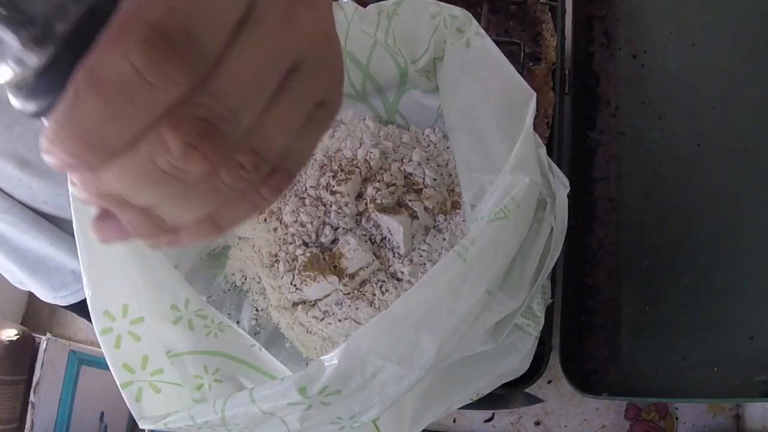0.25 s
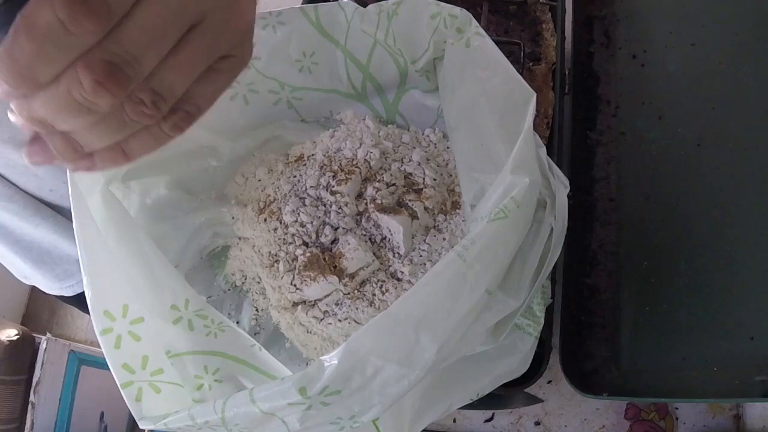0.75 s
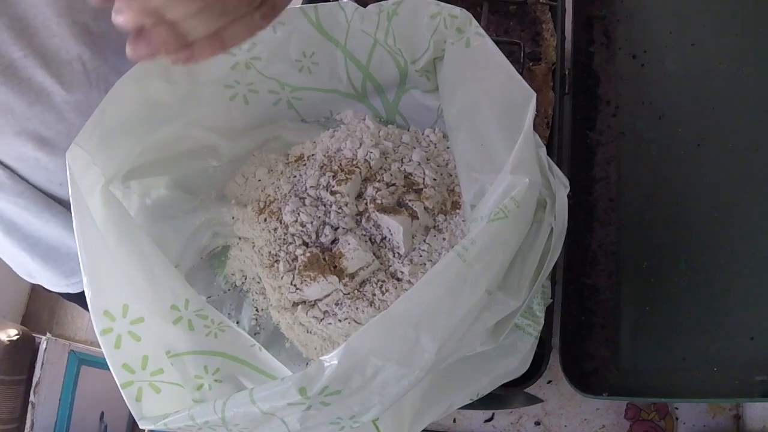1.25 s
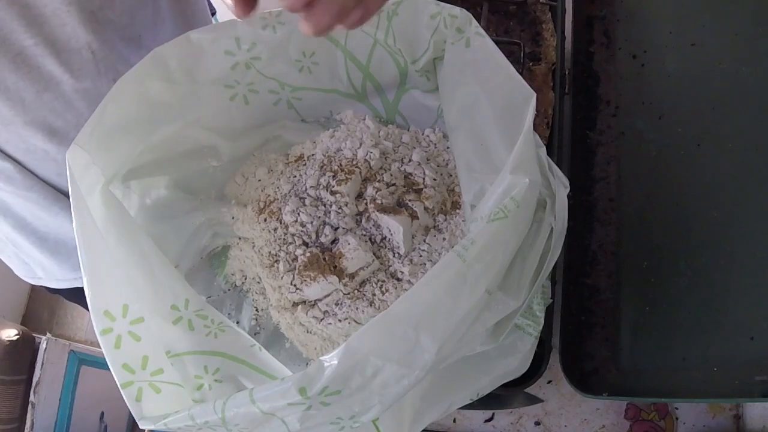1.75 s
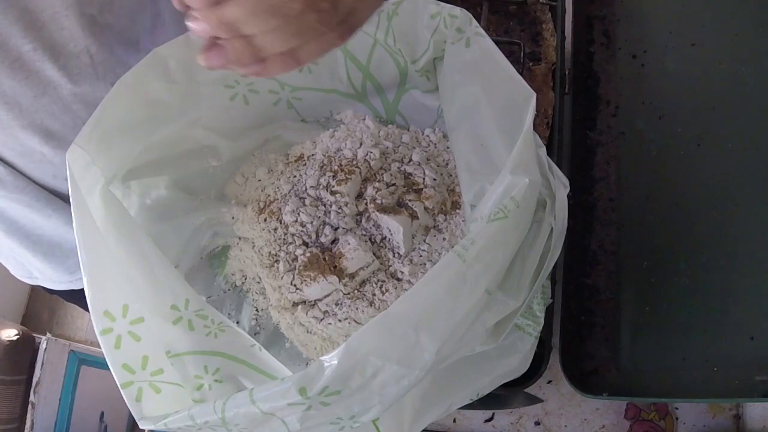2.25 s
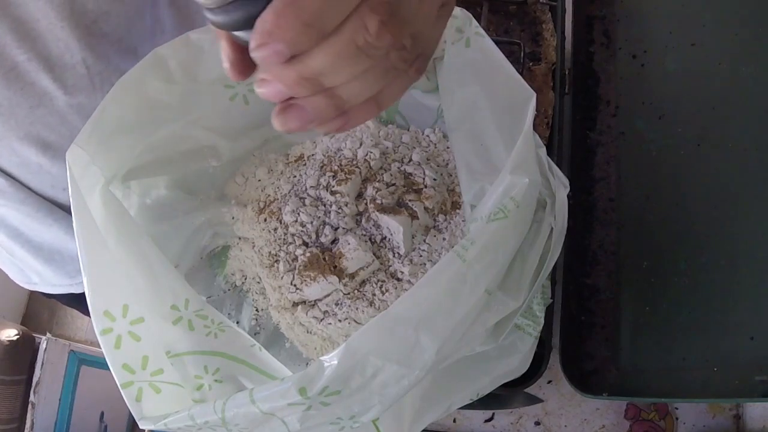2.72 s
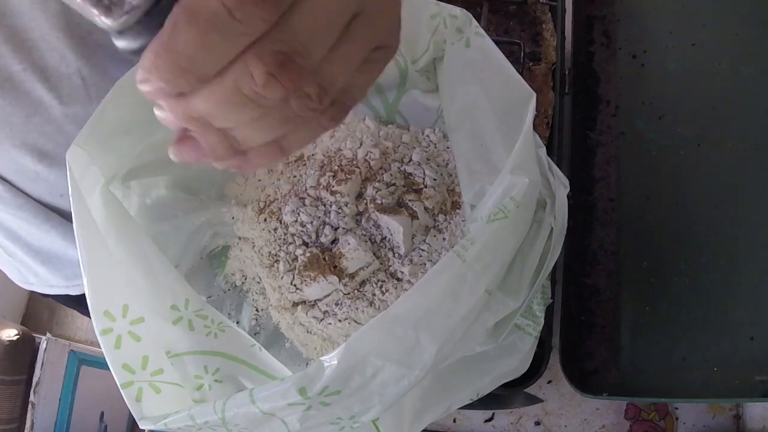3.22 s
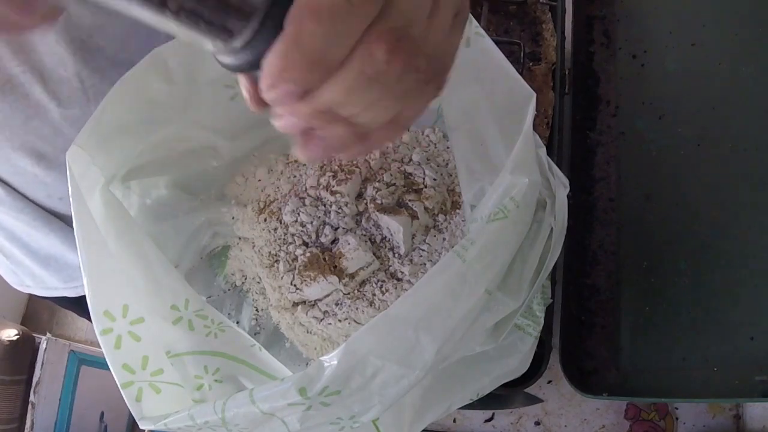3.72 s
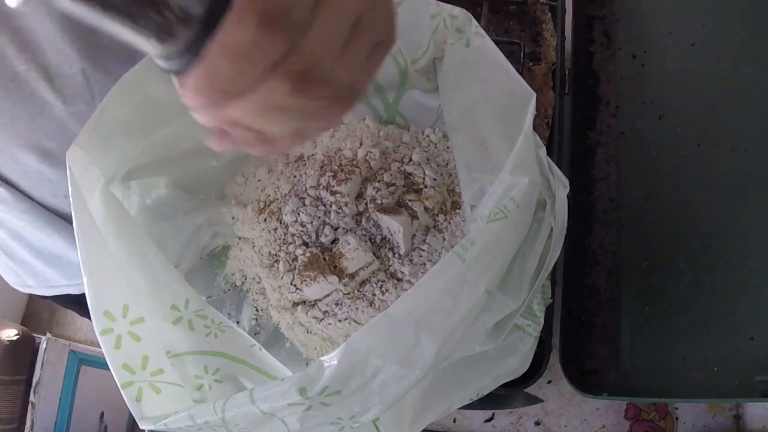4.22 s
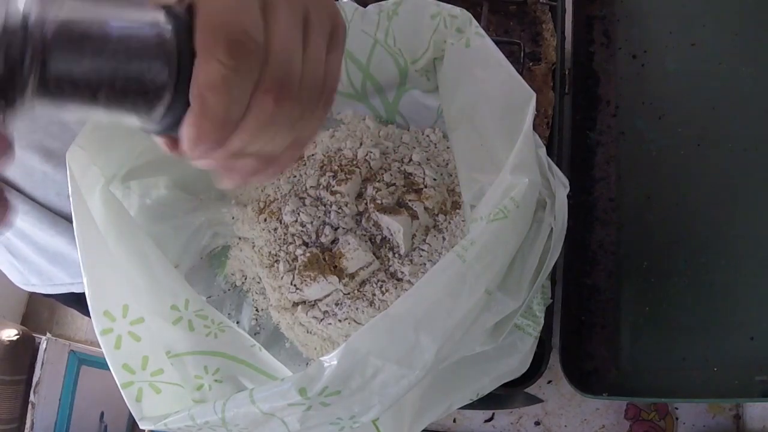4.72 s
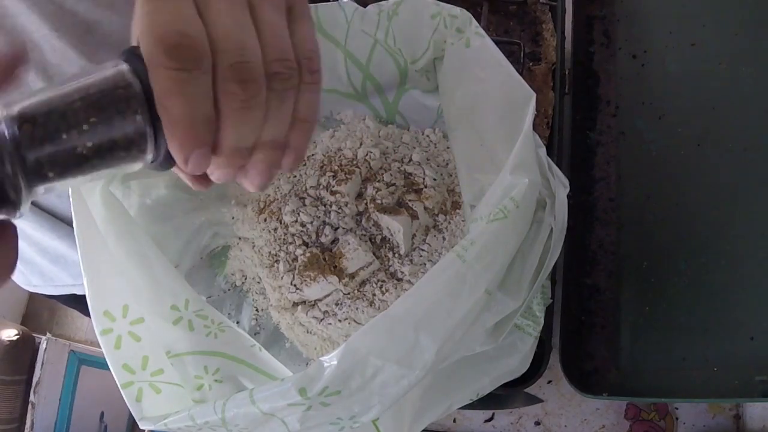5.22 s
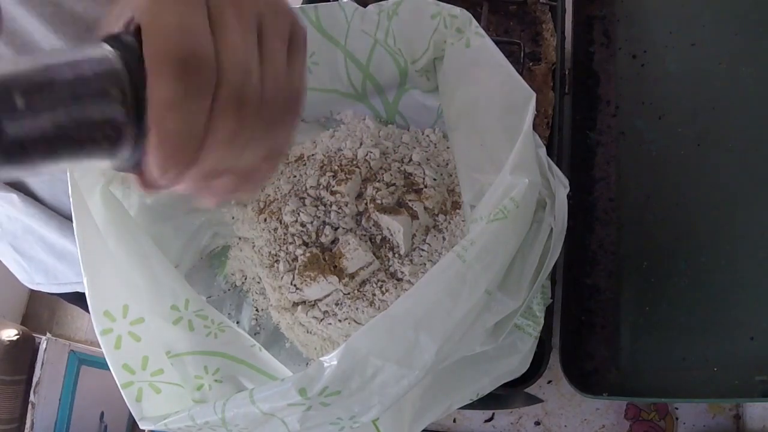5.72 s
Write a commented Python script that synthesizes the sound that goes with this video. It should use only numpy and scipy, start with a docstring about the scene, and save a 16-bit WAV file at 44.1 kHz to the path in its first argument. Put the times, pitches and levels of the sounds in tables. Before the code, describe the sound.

Close, dry crunching of peppercorns in a hand grinder, with bright glassy ticks and sliding rattles over a low kitchen rumble.

```python
"""Loose peppercorns tick and slide on a glass jar while a hand-turned mill crunches and cracks in bouts.
Corns on glass are noise under tiny contact envelopes, ringing the jar's modes, with a dry rustle.
The burr is dense grains and single loud bursts of noise through the housing's resonances.
Dull body thumps, a short kitchen echo, a low rumble, soft dull room noise and faint hums complete the scene."""
import sys
import numpy as np
from scipy import signal
from scipy.fft import rfft, irfft, next_fast_len
from scipy.io import wavfile
from scipy.ndimage import map_coordinates

SR = 44100
rng = np.random.default_rng(int(sys.argv[2]) if len(sys.argv) > 2 else 0)


def generate_wav(sig):
    """Save sig (samples, or channels by samples) to the path in sys.argv[1] as 16-bit PCM at SR."""
    pcm = np.round(np.clip(np.atleast_2d(sig).T, -1, 1) * 32767).astype(np.int16)
    wavfile.write(sys.argv[1], SR, pcm)


def gain_from_decibels(decibels):
    """Convert decibel values to linear amplitude factors."""
    exponent = np.asarray(decibels, float) / 20
    return 10 ** exponent


N = 262836  # length in samples

# All table levels are relative; each layer adds its own level.
# clearest corns striking the jar wall: start_s, level_db, low_ring_db (over level_db)
TICKS = [(0.0349, -24, -22), (.0705, -21, -22), (0.108, -14, -28), (.176, -30, -20), (.2189, -34, -6),
         (.2603, -26, -14), (0.2919, -22, -4), (.3302, -40, 0), (0.3661, -36, 2), (.5042, -22, -19),
         (.554, -31, -11), (.621, -36, -6), (0.6958, -33.5, -3), (0.7294, -29.5, -10), (0.7704, -26, -6.5),
         (0.7932, -23.5, -2.5), (.918, -7, -31), (0.9494, -18, 2), (0.9886, -24, -17), (1.0667, -25.5, -15),
         (1.1628, -31, -12), (1.2354, -31, -5.5), (1.27, -36, -7), (1.287, -25.5, -10.5), (1.37, -30, 7),
         (1.4581, -25, -1), (1.4948, -18, 0), (1.5697, -30, -11), (1.607, -23.5, -11.5), (1.6466, -24, -13),
         (1.6659, -22, -20), (1.728, -28, -21), (1.83, -31.5, -12), (1.899, -15, -15), (1.9643, -22, -19),
         (1.9771, -16, -20), (2.0008, -17, -15), (2.0557, -16.5, -28), (2.3253, -19, -14),
         (2.3472, -16, -4.5), (2.4025, -24, -10), (2.4224, -19, -11), (2.459, -23.5, -7),
         (2.4864, -20.5, -1.5), (2.5145, -12.5, -7.5), (2.5472, -19, -19), (2.584, -14.5, -5),
         (2.6196, -16, -8), (2.676, -24, 3), (2.8684, -22.5, -11), (2.8875, -22, -23),
         (3.0772, -24.5, -1.5), (3.0832, -22, -6), (3.112, -25, -10), (3.269, -11.5, 7), (3.4335, -17.5, 1),
         (3.4582, -16, -8.5), (3.573, -26, -12), (3.597, -21.5, -8), (3.681, -17, -13.5), (3.639, -30, -5),
         (3.9095, -18.5, -11), (3.974, -21, -29), (4.0414, -19.5, -7), (4.197, -14, -3.5), (4.3525, -31, 2),
         (4.499, -28, -9), (4.6078, -21, -12.5), (4.6275, -22.5, -21), (4.685, -24, -8),
         (4.7062, -13.5, -3), (4.728, -19, -4), (4.795, -22.5, -3), (4.8309, -20, -4), (4.9379, -21, -11),
         (5.0389, -27, -18), (5.072, -12, -20.5), (5.2677, -20, -20), (5.287, -14.5, -12), (5.3, -13, 0),
         (5.4091, -16, -10), (5.459, -18.5, -5), (5.6281, -20, -16), (5.66, -15, -17), (5.7478, -26, -17),
         (5.88, -28, -15), (5.9134, -30, -4), (5.9239, -18, -8)]
# loose corns sliding along the glass as the jar tips:
# peak_s, fall_s (time to drop 30 dB), upper_ring_db, low_ring_db and rustle_db (both over upper_ring_db)
SLIDES = [(.014, 0.14, -45.5, -7.5, -1.5), (.115, .12, -37, -7.5, -13), (.23, .05, -51, -9, -14),
          (.176, .08, -39.5, -20, -14), (0.299, 0.13, -45.5, -1, -4), (0.558, 0.025, -42, -20, -1.5),
          (0.809, 0.069, -41.5, -10, -6), (1.055, 0.11, -49, -9.5, 2), (.93, .03, -44, -3.5, 6),
          (1.292, 0.025, -28, -10.5, -9), (1.574, 0.061, -43, -14, -5), (1.66, .06, -49, -12, -2),
          (1.77, 0.068, -40, -5, 0), (1.815, 0.046, -43.5, -12, -3.5), (1.965, .03, -38, -13, -9),
          (2.41, 0.163, -35.5, -4.5, -15), (2.55, 0.11, -40, 1, -23), (2.628, 0.097, -39, 1, -14),
          (2.909, 0.16, -40.5, -5, -6), (3.006, 0.048, -39.5, -6.5, -20), (3.117, 0.051, -22.5, -7, -15),
          (3.33, 0.11, -44.5, -4, 0), (3.438, 0.027, -35, -3, 4.5), (3.465, 0.085, -35.5, -3, 0),
          (3.499, 0.054, -27.5, -10, -18), (3.685, 0.016, -20, -9, -12), (3.7, 0.036, -22.5, -10.5, -12),
          (3.943, 0.33, -34.5, -6.5, -11), (4.203, 0.048, -28, -6, -8), (4.235, .04, -38, -8, -10),
          (4.509, 0.12, -29, -3.5, -1.5), (4.613, .06, -40.5, -13, -1.5), (4.691, 0.071, -31.5, -4, -10.5),
          (4.743, 0.072, -22, -8.5, -11), (4.877, 0.57, -39, -14, -4), (5.083, 0.1, -35.5, -10, 6.5),
          (5.32, 0.064, -18.5, -10.5, -13), (5.38, 0.16, -30, -4.5, -7.5), (5.47, 0.21, -31, -18, -8.5),
          (5.664, 0.086, -27, -14, 1.5), (5.76, 0.072, -33, -10, -4.5), (5.931, 0.093, -27.5, -3.5, -8.5)]
# faint bed between bites and slides: time_s, rolling_db, scraping_db
BED = [(0, -46, -55), (.3, -53, -59.5), (.35, -56, -75), (.6, -56, -76), (.8, -60, -75), (1.05, -50, -68),
       (1.15, -63, -76), (1.26, -70, -74), (1.6, -51, -68), (1.9, -65, -63), (1.93, -37.5, -58),
       (2.08, -44, -62), (2.2, -44, -55), (2.75, -40.5, -59), (2.98, -50, -65), (3.05, -53, -64),
       (3.25, -47, -62), (3.6, -43, -67), (4.1, -42, -58), (4.17, -49, -56.5), (4.27, -66, -70),
       (4.33, -66, -60.5), (4.4, -48.5, -54), (5.2, -47, -60), (5.6, -50, -58), (5.83, -64, -64),
       (5.96, -44, -61.5)]
# how much a bite shakes the corns, over the bite: upper_ring_db, low_ring_db, rustle_db
SHAKE_DB = (-23, -13, -15)
# ringing modes of the glass jar, lowest first: pitch_hz, width_hz, level_db
JAR = [(3165, 190, 1), (4800, 400, -14), (6700, 400, -12), (7800, 220, 0), (8200, 400, -3),
       (10100, 400, -14), (12400, 700, -12)]
# colour of a corn's dry click, without the ring: pitch_hz, level_db (per Hz)
CLICK = [(300, -18), (1000, -23), (2500, -3.5), (5000, -0.5), (7000, 2.5), (10000, -3), (15000, -6)]
# the burr bites into a heap of fragments, grinds on and slips free:
# start_s, hold_s, fall_s (time to drop 30 dB, sign ignored), level_db, thud_db (over level_db)
BITES = [(0.001, .002, 0.13, -42, -30.5), (0.283, .012, 0.6, -62, -20), (.366, 0.006, 0.0536, -18.5, -18),
         (0.403, 0.013, 0.1069, -22, -23), (0.445, 0.056, .03, -40.5, -6.5), (.772, .025, -0.3, -51, -13),
         (0.856, 0.0095, .03, -38, -13), (.897, 0.011, -0.04, -33, -3), (.919, 0.018, .05, -25, -12),
         (0.946, 0.018, 0.03, -37, -19), (1.111, .006, -3, -64, -26), (1.278, .01, 1, -54, -22),
         (1.373, .012, 0.1, -34, -5), (1.391, 0.014, 0.15, -29, -8), (1.46, 0.042, -0.1, -36.5, -18),
         (1.499, .006, 0.08, -26, -17), (1.521, 0.012, 0, -32, -7), (1.668, 0.043, -0.05, -46, -8),
         (1.731, 0.037, 0, -37, -16), (1.901, 0.00089, 0.0151, -14.5, -19), (1.926, .005, 0.12, -37, -17),
         (2.149, 0.02, 0.11, -37, 0.5), (2.175, .025, 0.08, -39.5, -2), (2.203, 0.039, 0.03, -27, -12),
         (2.258, .03, 0.02, -27.5, -6), (2.306, 0.031, 0, -37.5, -3), (2.594, 0.03, -0.16, -51.5, -3),
         (2.648, .025, 0.01, -42, -6), (2.676, .01, 0.09, -33, -12), (2.712, 0.05, 0.08, -31, -9.5),
         (2.808, 0.01, 0.03, -28, -10.5), (3.082, .045, 0.5, -51, -10), (3.183, 0.013, .03, -44, -4),
         (3.202, 0.014, .045, -30.5, -9.5), (3.276, .004, 0.0636, -20, -7), (3.3, 0.043, 0.05, -33.5, -1),
         (3.372, 0.042, 0.27, -43.5, -3.5), (3.676, 0.013, 0.4, -48, -13), (3.754, .02, .05, -35, -3),
         (3.775, .03, 0.08, -33, -3), (3.839, 0.0272, .08, -33, -6), (4.192, .015, 0.5, -57, -8),
         (4.345, .008, .05, -33.5, -10), (4.359, 0.013, 0.06, -29, -9), (4.398, 0.038, 0.18, -41, 0),
         (4.439, 0.039, 0.11, -36, -2), (4.687, 0.068, .1, -48, -8), (4.905, 0.023, 0.16, -38.5, -9),
         (4.936, 0.061, 0.19, -35, -8), (4.997, 0.055, 0, -29, -6), (5.093, 0.0083, .04, -38, -3),
         (5.28, .05, 1.2, -46, -11), (5.507, 0.039, 0.09, -31, -4.5), (5.575, 0.052, 0.04, -32, -7.5),
         (5.66, .02, 0.2, -45, -15), (5.697, .008, 0, -41.5, -8), (5.914, .02, -1, -44, -8)]
# whole corns splitting in the burr: start_s, level_db, knock_hz, thud_db and snap_db (both over level_db)
CRACKS = [(0.292, -35, 2900, -24, 9), (0.3651, -15, 2590, -36, -1), (.405, -11.5, 2480, -11.5, 3),
          (0.8579, -29.5, 2780, -9.5, 2), (0.8966, -8, 2480, -20, -8), (0.919, -5, 2780, -21, 1),
          (1.112, -29, 1700, -31, -12), (1.286, -40, 2660, -17, 4), (1.3754, -18, 2720, -16, -23),
          (1.3905, -10, 2550, -44, -30), (1.4617, -30, 2540, -27, -2), (1.497, -12, 2500, -20, -1),
          (1.732, -32, 1400, -4.5, 0), (1.7578, -23, 1690, -14, -4), (1.9008, -7, 2810, -17.5, 5),
          (2.053, -44, 2830, -14, 20), (2.1433, -18.5, 1420, -15, -22), (2.2055, -14.5, 2510, -22, -21),
          (2.4, -43, 2870, -14.5, 27), (2.484, -44, 2900, -37.5, 15.5), (2.5127, -43, 2890, -12, 21.5),
          (2.6502, -32.5, 2900, -3, -5), (2.6786, -18, 1670, -15, -4), (2.7156, -17, 2700, -10.5, -14),
          (2.7511, -18.5, 2730, -13.5, -24), (2.808, -16.5, 2230, -16, -29), (3.1153, -35, 2810, -13, 11),
          (3.184, -36, 2370, -4.5, 7.5), (3.2007, -29, 2870, -29, -17), (3.2692, -13.5, 1690, -9.5, 1.5),
          (3.432, -47, 2800, -20, 14.5), (3.7547, -38, 2570, -6, -9.5), (3.92, -35.5, 2810, -34, 19.5),
          (4.196, -35.5, 2890, -13, 6.5), (4.347, -26, 2890, -18, -12), (4.351, -17, 1600, -17.5, -19),
          (4.3647, -15, 2420, -20.5, -28), (4.4392, -25.5, 2720, -8, -18.5), (4.912, -36.5, 2550, -2, -1.5),
          (4.938, -18, 2570, -30, -6.5), (4.9673, -19.5, 2130, -26, -9), (4.98, -20, 2570, -15, -12.5),
          (5.282, -39, 2900, -25, 4), (5.2989, -39, 2720, -9, 2), (5.311, -29, 2870, -11.5, 12),
          (5.41, -32, 2810, -17, 18), (5.5073, -19.5, 1460, -28, -17), (5.5487, -15, 2050, -23, -15),
          (5.5707, -22, 2650, -27, -12), (5.6119, -15, 2510, -12.5, -15)]
# resonances of the burr housing: pitch_hz, width_hz, level_db
HOUSING = [(320, 36, 2), (895, 26, -3), (1290, 450, -1), (1700, 52, 0.5), (2250, 42, -10), (2550, 260, 6.5),
           (3620, 82, -2), (5100, 120, -36)]
# broad colour of the crunch: pitch_hz, level_db (per Hz)
CRUNCH = [(120, -54), (200, -1.5), (874, -2), (992, -9), (1170, -3.5), (2560, -5), (10200, -9.5),
          (15500, -52)]
# colour of the low rumble: pitch_hz, level_db (per Hz)
RUMBLE = [(12, -5.5), (22, 4.5), (40, -5.5), (52, -9.5), (64, -2), (80, -15.5), (120, -21), (165, -23),
          (200, -29.5), (270, -36.5), (450, -77), (900, -120)]
# colour of the soft dull room noise, strongest near 300 Hz: pitch_hz, level_db (per Hz)
DULL_NOISE = [(150, -2), (300, 25.5), (1000, 6.5), (3000, 12.5), (8000, -44), (15000, -37), (16500, -40)]
# faint unsteady hums, before their swell: pitch_hz, width_hz (of one pass; two are made), level_db (rms)
HUMS = [(177, 18, -59), (243.2, 3, -62.5), (310.4, 10.5, -60), (1400, 87, -64.5)]
# rise and fall of the hums: time_s, low_hums_db, highest_hum_db
HUM_SWELL = [(0, -5, 5), (.3, -1, 0), (.4, 5, -10), (.9, -11, -14), (1.3, -15, -11), (1.8, -3, -8),
             (2.1, -6.5, 2), (2.5, -10, -34), (3.8, -37, -12.5), (4, -6, -5), (4.35, 1, 5), (4.5, 2, -1),
             (4.8, -14, -5), (5.96, -15, -13)]
# echo decay of the kitchen: pitch_hz, decay_s (time to drop 60 dB)
KITCHEN = [(300, 0.13), (2000, 0.13), (8000, 0.11), (15000, 0.065)]
# low jolts of the mill's body in the hand: start_s, level_db
JOLTS = [(1.685, -43), (1.745, -36), (1.9, -23), (2.152, -38), (2.612, -40), (3.38, -44), (5.615, -39)]
# colour of the bass that differs between left and right: pitch_hz, level_db (per Hz)
SIDE_BASS = [(15, -8), (30, 0), (60, -8), (120, -18), (270, -26), (600, -45), (1200, -80), (2200, -120)]


def unit(x):
    """Scales a sound to an average strength (rms) of 1."""
    return x / np.sqrt(np.mean(x ** 2) + 1e-20)


def along(points, hz):
    """Reads (Hz, value) points at any frequency, on a log scale."""
    f, v = np.transpose(points)
    return np.interp(np.log(hz + 1), np.log(f + 1), v)


def curves(rows):
    """Draws each column after the time as a line with one value per sample."""
    time_s, *columns = np.transpose(rows)
    return [np.interp(np.arange(N) / SR, time_s, column) for column in columns]


def wobble(rate):
    """A smooth random curve through `rate` random points a second."""
    knots = rng.standard_normal(int(N * rate / SR) + 4)
    return map_coordinates(knots, [np.arange(N) * rate / SR])


def filtered(x, response):
    """Multiplies the spectrum of x by a response given as a function of frequency."""
    size = next_fast_len(N + SR // 2)
    return irfft(rfft(x, size) * response(np.fft.rfftfreq(size, 1 / SR)), size)[..., :N]


def causal(gain):
    """Minimum phase: a filter with this gain that answers as early as it can."""
    cepstrum = irfft(np.log(gain + 1e-6))
    half = len(cepstrum) // 2
    cepstrum[1:half] *= 2
    cepstrum[half + 1:] = 0
    return np.exp(rfft(cepstrum))


def mode(f, hz, width, db):
    """One resonance: strongest at hz, and dying faster the wider it is."""
    return gain_from_decibels(db) * 1j * f * width / (hz * hz - f * f + 1j * f * width)


def noise(response):
    """Random noise coloured by a response, with rms 1."""
    return unit(filtered(rng.standard_normal(N), response))


def scaled(response, lo_hz, hi_hz):
    """The same response, set to a mean power of 1 between two frequencies."""
    def out(f):
        h = response(f)
        inside = (f > lo_hz) & (f < hi_hz)
        return h / np.sqrt(np.mean(np.abs(h[inside]) ** 2))
    return out


def grains(per_second, spread_db, t60):
    """Envelope of random contacts, most small and a few large, each dying fast."""
    hits = rng.random(N) < per_second / SR
    size = hits * gain_from_decibels(spread_db * np.minimum(rng.exponential(size=N), 4))
    return signal.lfilter([1], [1, -gain_from_decibels(-60 / (t60 * SR))], size)


def bursts(times, levels_db, t60):
    """Envelope of single blows that start at once and drop 60 dB in t60 seconds."""
    env, t = np.zeros(N + SR), np.arange(SR // 8) / SR
    for start_s, db in zip(times, levels_db):
        env[round(start_s * SR):][:len(t)] += gain_from_decibels(db - 60 * t / t60)
    return env[:N]


def swells(times, rises, holds, falls, levels_db):
    """Gain of overlapping swells that rise, hold and fall steadily in dB; their powers add."""
    t, power = np.arange(N) / SR, np.zeros(N)
    for s, rise, hold, fall, db in np.broadcast(times, np.abs(rises), np.abs(holds), np.abs(falls), levels_db):
        near = slice(max(0, round((s - 2 * rise) * SR)), round((s + hold + 2 * fall) * SR))
        # 0 or less during the hold, 1 where the swell is 30 dB down
        away = np.maximum((s - t[near]) / rise, (t[near] - s - hold) / fall)
        power[near] += gain_from_decibels(db - 30 * np.maximum(away, 0)) ** 2
    return np.sqrt(power)


def bites():
    """Gains of the burr's crunch and of its thud: a quick bite, a hold, then a slip free."""
    start_s, hold_s, fall_s, level_db, thud_db = np.transpose(BITES)
    rise_s = 0.002  # time to rise 30 dB
    crunch = swells(start_s, rise_s, hold_s, fall_s, level_db)
    thud = swells(start_s, rise_s, hold_s, fall_s, level_db + thud_db)
    return crunch, thud


def rolling():
    """Gains of upper ring, lowest ring and dry rustle: the bed, the slides and the shake of each bite."""
    peak_s, fall_s, level_db, low_db, rustle_db = np.transpose(SLIDES)
    rise_s = 1.08 * fall_s  # a slide gathers more slowly than it stops
    bed, bite = gain_from_decibels(curves(BED)[0]), bites()[0]
    gains = []
    for bed_db, over_db, shake_db in zip((0, -6.5, -10), (0, low_db, rustle_db), SHAKE_DB):
        slide = swells(peak_s, rise_s, 0, fall_s, level_db + over_db)
        gains.append(np.sqrt((gain_from_decibels(bed_db) * bed) ** 2 + slide ** 2 + (gain_from_decibels(shake_db) * bite) ** 2))
    return gains


def jar():
    """Corns tick, roll and slide on glass: contact noise rings the jar's modes and adds a dry rustle."""
    start_s, level_db, low_db = np.transpose(TICKS)
    high, low, dry = rolling()
    tumble = unit(grains(1100, spread_db=3.5, t60=0.013) * gain_from_decibels(1.2 * wobble(30)))
    # corns rubbing on each other: many more, finer contacts, partly in step with the tumbling
    fine = unit(grains(2500, spread_db=7.5, t60=0.034))
    rub = unit(0.5 * tumble + fine)

    # fresh noise for every mode, as each tick lands elsewhere on the wall
    def strike(roll, tick_db):
        return (roll + bursts(start_s, tick_db, 0.006)) * rng.standard_normal(N)

    low_hits = strike(gain_from_decibels(15.5) * low * tumble, level_db + low_db + 15)
    ring = filtered(low_hits, lambda f: mode(f, *JAR[0]))
    for row in JAR[1:]:
        high_hits = strike(gain_from_decibels(10.5) * high * tumble, level_db + 11)
        ring += filtered(high_hits, lambda f: mode(f, *row))
    dry_hits = strike(gain_from_decibels(5) * dry * rub, level_db - 14)
    rustle = filtered(dry_hits, lambda f: causal(gain_from_decibels(along(CLICK, f))))
    return ring + rustle


def burr():
    """Fragments crunch in dense bursts and whole corns split in loud ones, shaking the housing."""
    start_s, level_db, knock_hz, thud_db, snap_db = np.transpose(CRACKS)

    def ringing(f):
        return causal(gain_from_decibels(along(CRUNCH, f)) * (1.38 + sum(np.abs(mode(f, *row)) for row in HOUSING)))

    housing = scaled(ringing, 440, 1800)
    crunch = unit(grains(900, spread_db=3.5, t60=0.015) * gain_from_decibels(1.8 * wobble(35)))
    bed = gain_from_decibels(curves(BED)[1])
    bite, bite_thud = bites()
    grind = np.hypot(bed, bite)
    heavy = np.hypot(gain_from_decibels(-5) * bed, bite_thud)

    def crush(db, gain=grind):
        return gain_from_decibels(db) * gain * crunch * rng.standard_normal(N)

    # life stretches the basic decay of a splitting corn, 0.034 s to drop 60 dB
    def blow(over_db, life=1.0):
        return bursts(start_s, level_db + over_db, life * 0.034) * rng.standard_normal(N)

    # every corn breaks its own way: more or less thud, woody knock, edge and brittle snap
    thud_hits = crush(11.9, heavy) + blow(thud_db + 13.5, 1.56)
    thud = filtered(thud_hits, lambda f: housing(f) * mode(f, 866, 786, 0))
    knock = filtered(crush(5.95), lambda f: housing(f) * mode(f, 2090, 1950, 0))
    # a crack's knock pitch shares its power between a deep and a high resonance
    high = np.clip((knock_hz - 1400) / 1300, 0.05, 0.95)
    knock += filtered(blow(6 + 10 * np.log10(1 - high)), lambda f: housing(f) * mode(f, 1520, 460, 0))
    knock += filtered(blow(6 + 10 * np.log10(high)), lambda f: housing(f) * mode(f, 2520, 830, 0))
    # a more brittle corn also has more edge: 0.48 dB for each dB of snap
    edge_hits = crush(9.54) + blow(0.48 * snap_db + 5.5, 0.96)
    edge = filtered(edge_hits, lambda f: housing(f) * mode(f, 5080, 2920, 0))
    snap_hits = crush(-21.5) + blow(snap_db - 7)
    snap = filtered(snap_hits, lambda f: (1j * f / (6000 + 1j * f)) ** 2)  # keeps the treble
    return thud + knock + edge + snap


def room_noise():
    """Appliance rumble, soft dull noise and narrow bands of noise that hum, swell and fade."""
    rumble = gain_from_decibels(-35.5 + 0.35 * wobble(2.75)) * noise(lambda f: gain_from_decibels(along(RUMBLE, f)))
    dull = gain_from_decibels(-62) * noise(lambda f: gain_from_decibels(along(DULL_NOISE, f)))
    hums = []
    for hz, width, db in HUMS:
        hums.append(gain_from_decibels(db) * noise(lambda f: mode(f, hz, width, 0) ** 2))
    low_db, high_db = curves(HUM_SWELL)
    return rumble + dull + gain_from_decibels(low_db) * sum(hums[:-1]) + gain_from_decibels(high_db) * hums[-1]


def kitchen(x):
    """Echo as fading noise; each stretch of sound gets a new random tail, so the echo has no fixed tone."""
    count, delay = 60, 90  # stretches; samples before the echo starts
    out, step = np.zeros(N + SR), N // count + 1
    for k in range(count):
        hz, t, spectrum = signal.stft(rng.standard_normal(SR // 3), SR, nperseg=256)
        fade = gain_from_decibels(-60 * t / along(KITCHEN, hz)[:, None])
        tail = signal.istft(spectrum * fade, SR, nperseg=256)[1]
        wet = signal.fftconvolve(x[k * step:(k + 1) * step], tail / np.linalg.norm(tail))
        start = k * step + delay
        out[start:][:len(wet)] += wet[:N + SR - start]
    return out[:N]


def body():
    """Jolts of the mill's body: short bursts of noise through a low resonance give dull thumps."""
    start_s, level_db = np.transpose(JOLTS)
    push = bursts(start_s, level_db + 17, 0.04) * rng.standard_normal(N)
    return filtered(push, lambda f: mode(f, 290, 240, 0) ** 2)


def scene():
    """The mill, its echo and the room; left and right differ only in faint bass."""
    mill = jar() + burr() + body()
    mid = mill + gain_from_decibels(-7.5) * kitchen(mill) + room_noise()
    side = gain_from_decibels(-66) * noise(lambda f: gain_from_decibels(along(SIDE_BASS, f)))
    return np.array([mid + side, mid - side])


def roll_off(x):
    """The treble ends steeply here."""
    return signal.sosfilt(signal.butter(12, 16650, fs=SR, output="sos"), x)


def record(dry):
    """Rounds off the loudest peaks, dims the treble above about 15 kHz and adds a small steady offset."""
    rounded = dry / (1 + np.abs(dry / 0.9) ** 6) ** (1 / 6)
    dimmed = filtered(rounded, lambda f: gain_from_decibels(np.interp(f, [15250, 15450, 16700], [0, -22, -40])))
    mix = dimmed - 0.0018
    return roll_off(mix)


dry = scene()
out = record(dry)
generate_wav(out)
```